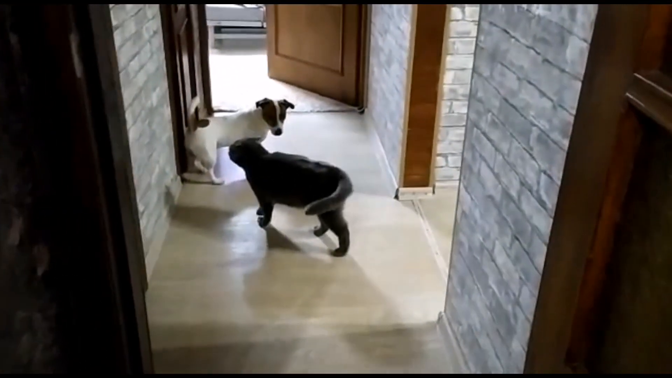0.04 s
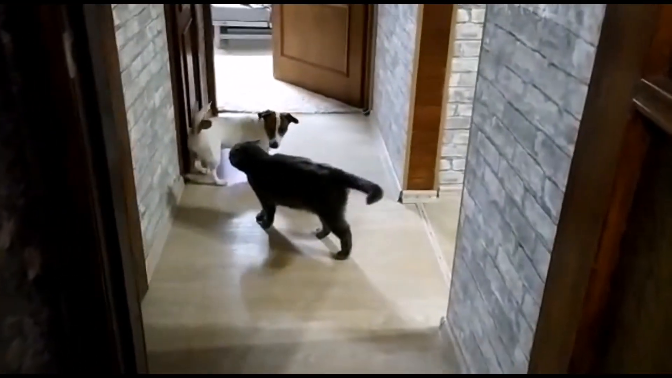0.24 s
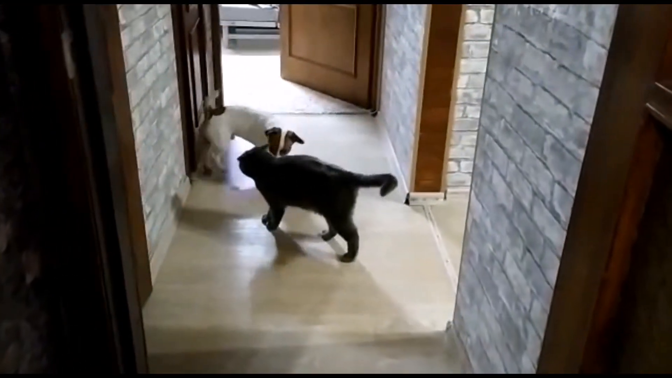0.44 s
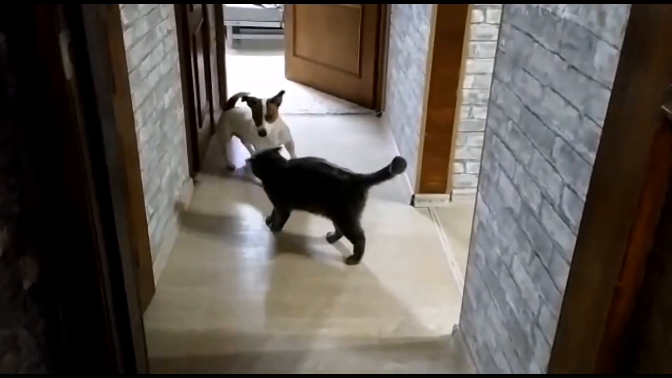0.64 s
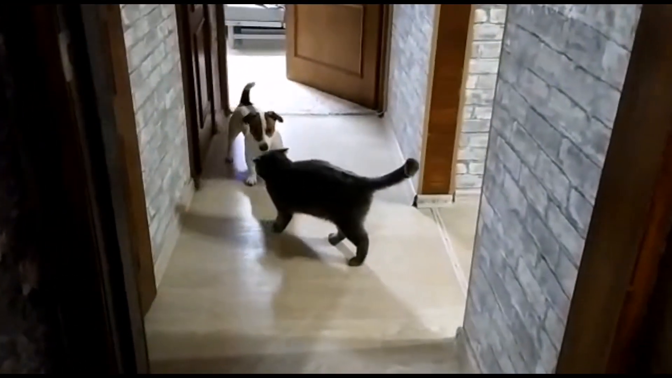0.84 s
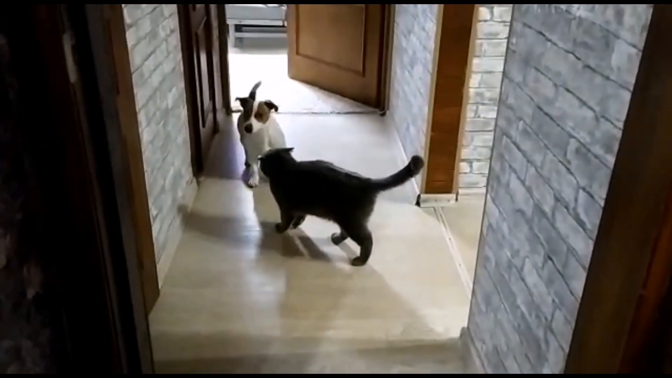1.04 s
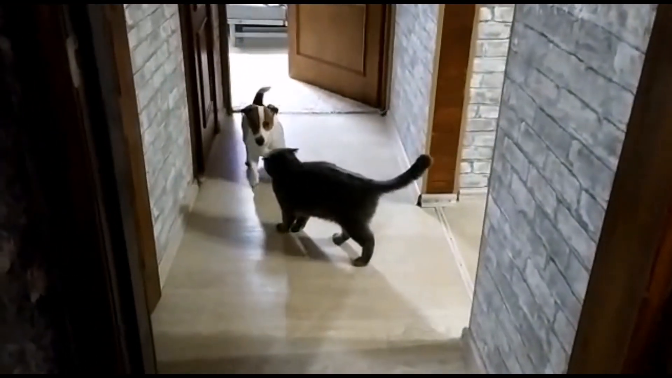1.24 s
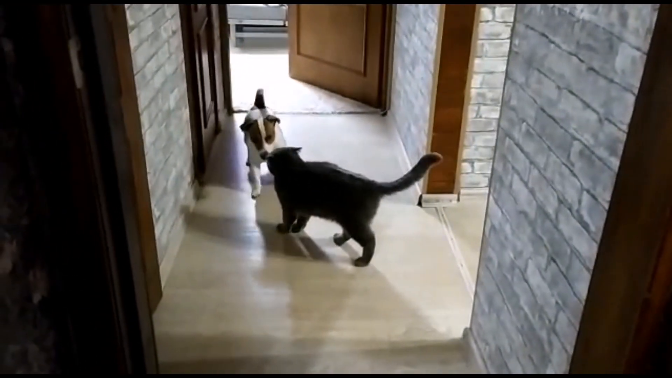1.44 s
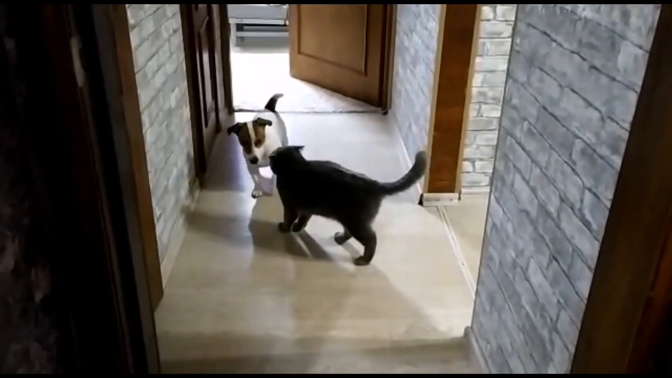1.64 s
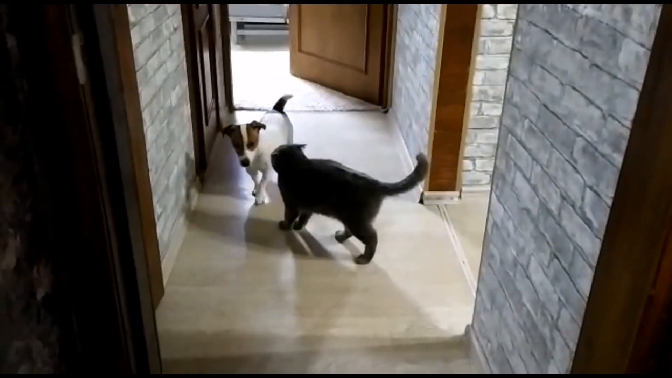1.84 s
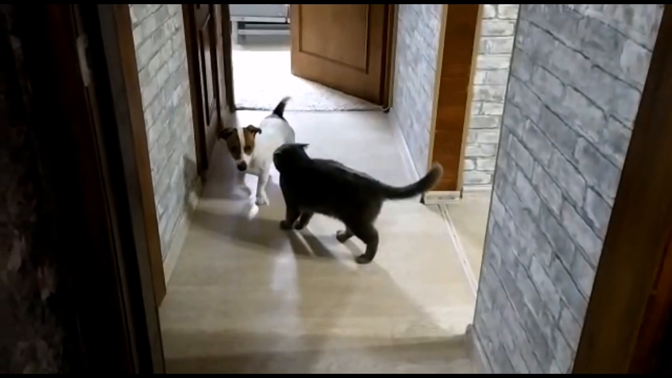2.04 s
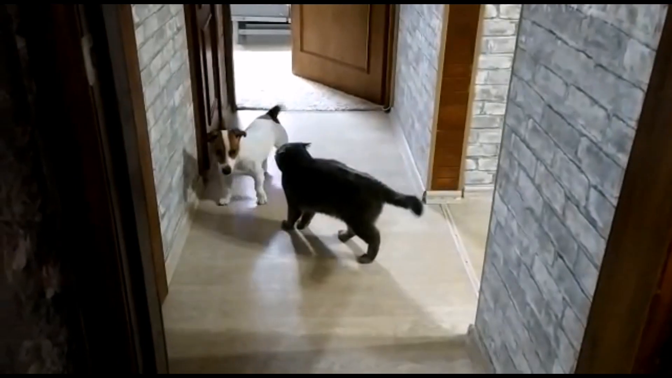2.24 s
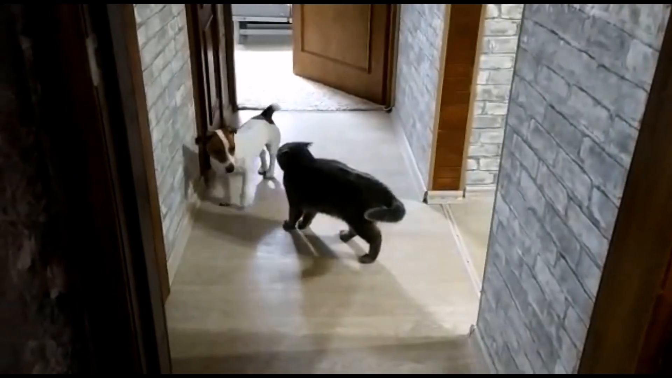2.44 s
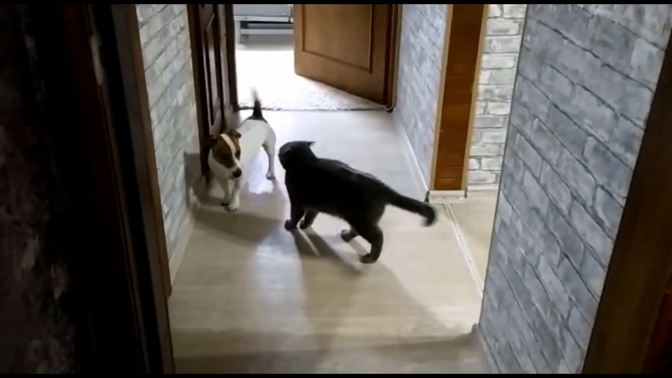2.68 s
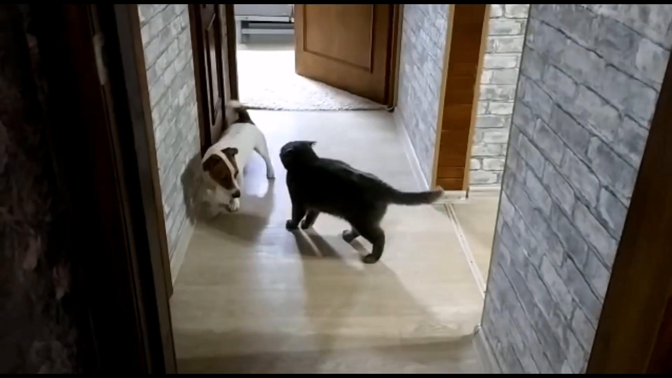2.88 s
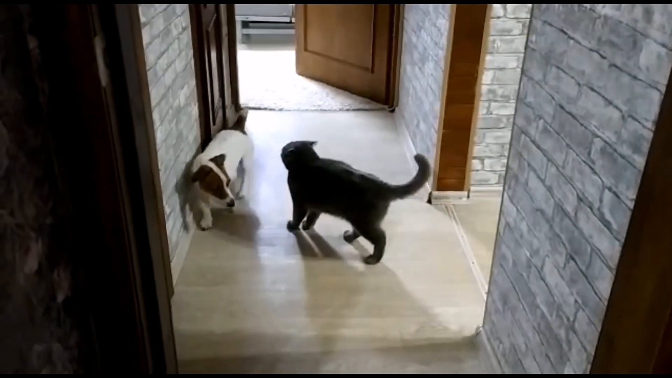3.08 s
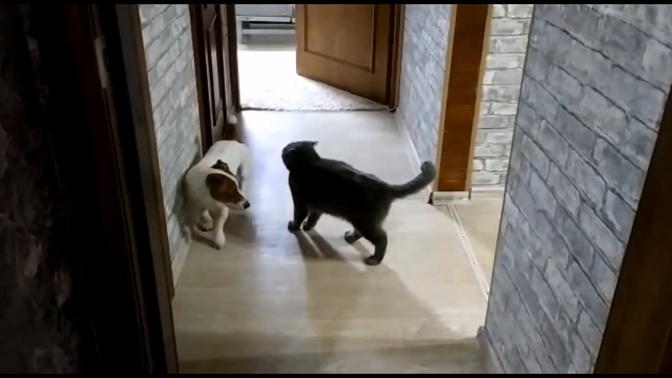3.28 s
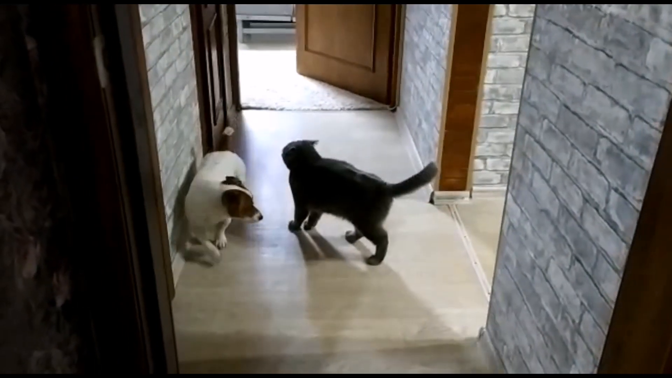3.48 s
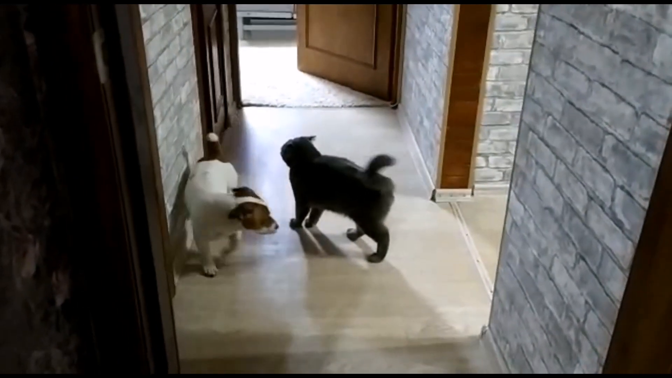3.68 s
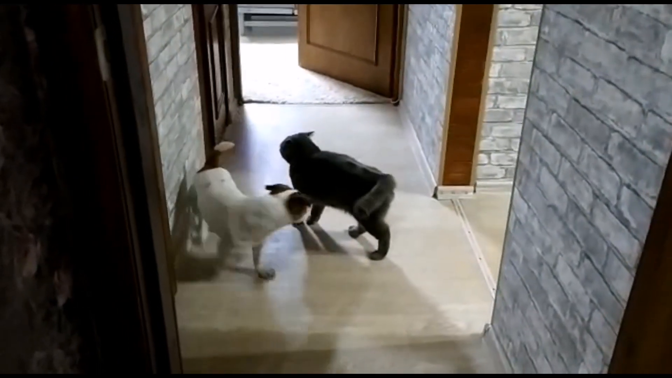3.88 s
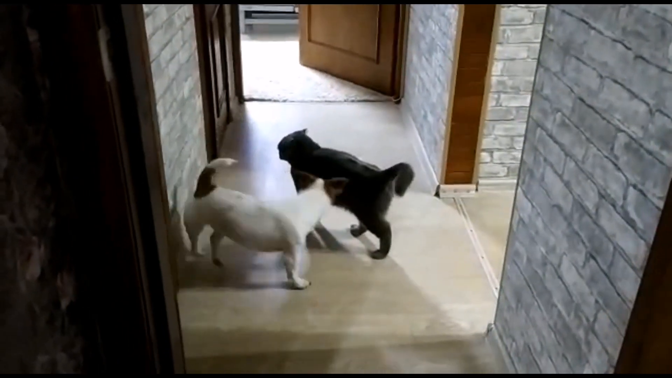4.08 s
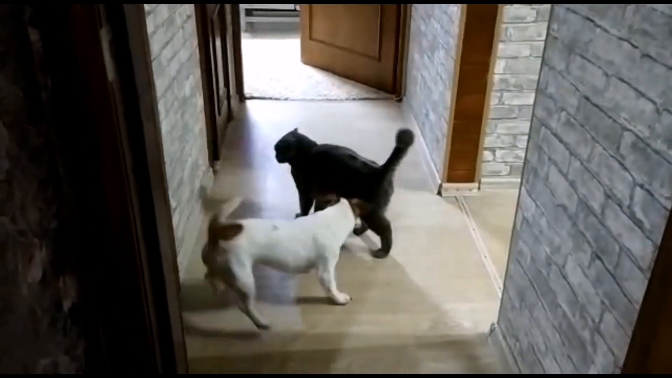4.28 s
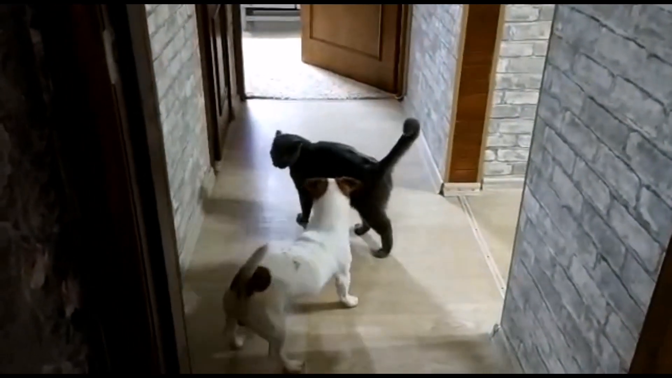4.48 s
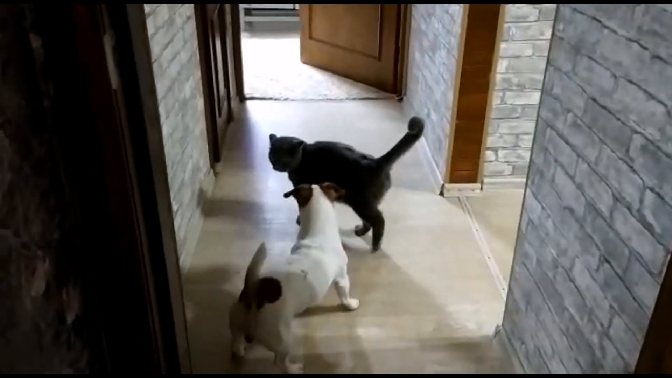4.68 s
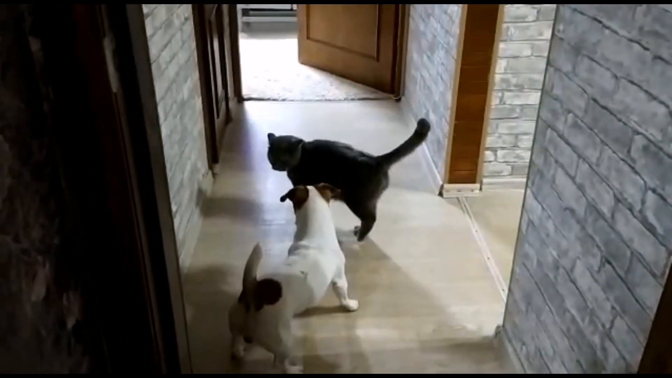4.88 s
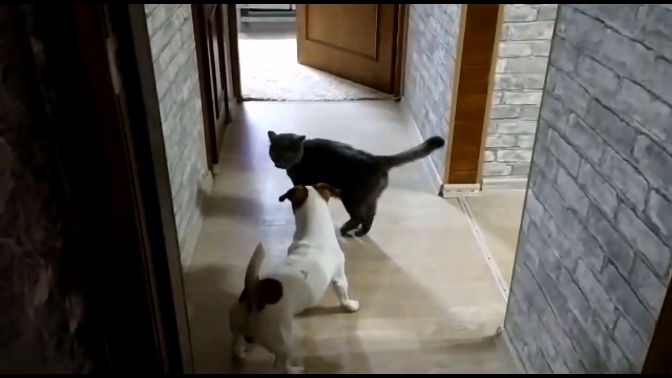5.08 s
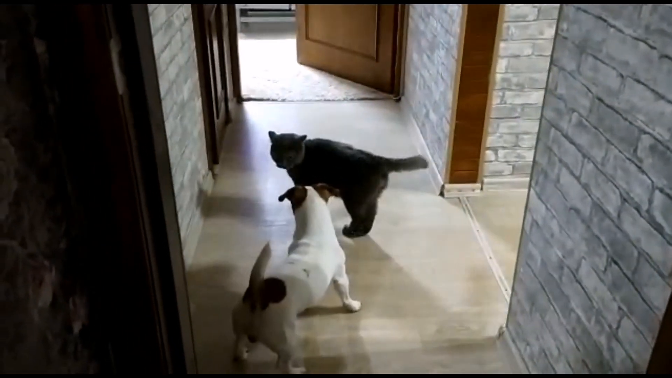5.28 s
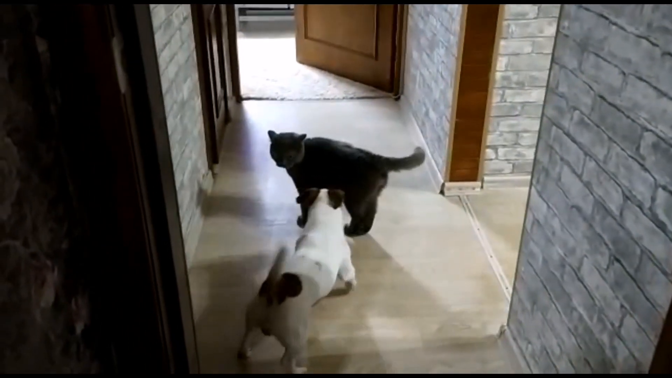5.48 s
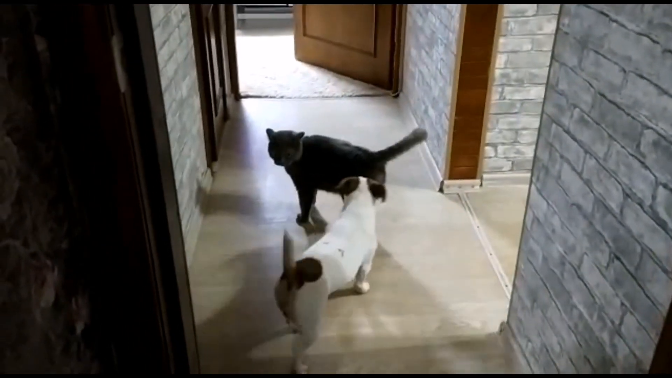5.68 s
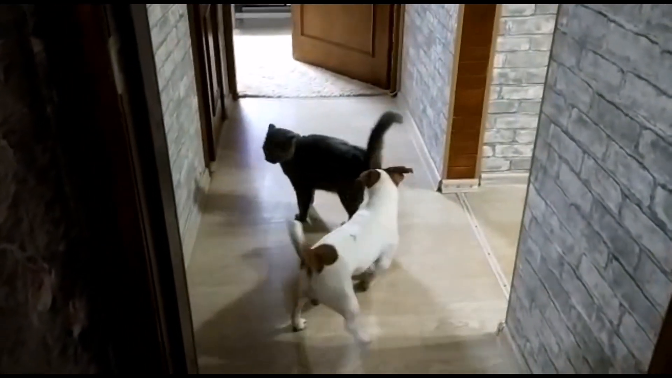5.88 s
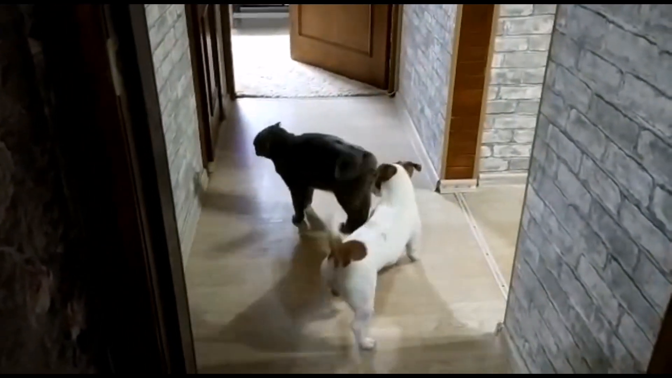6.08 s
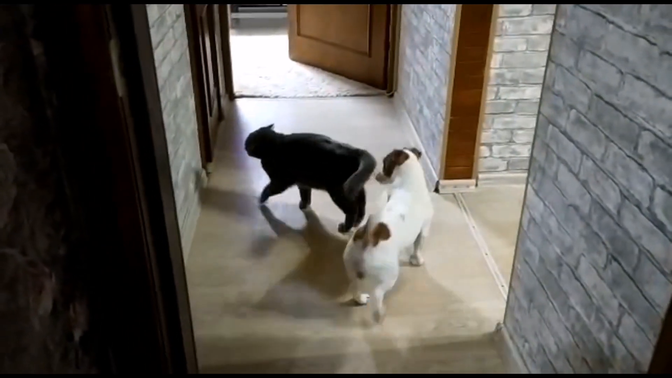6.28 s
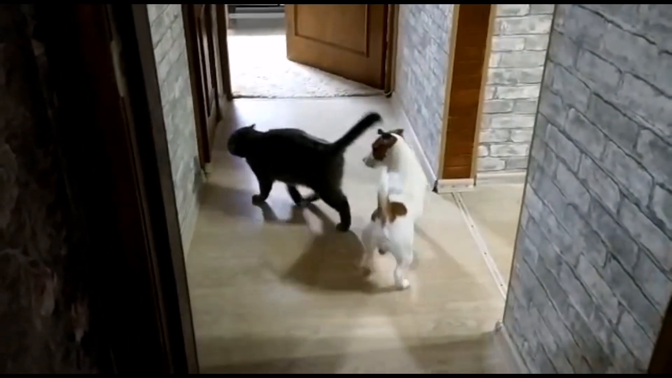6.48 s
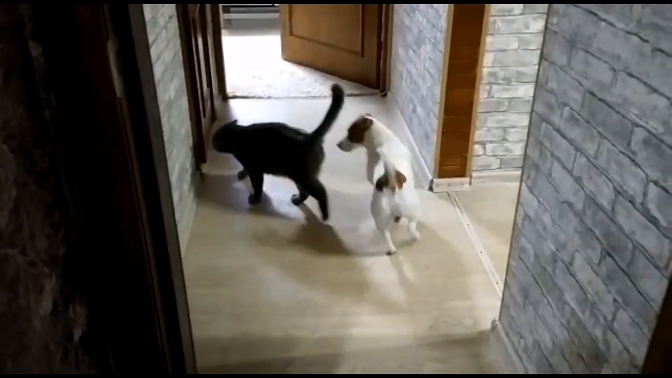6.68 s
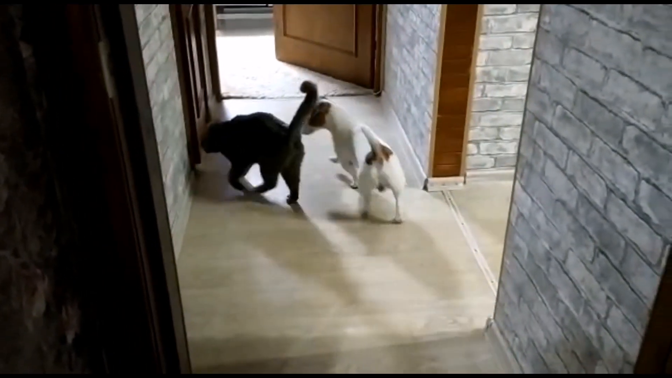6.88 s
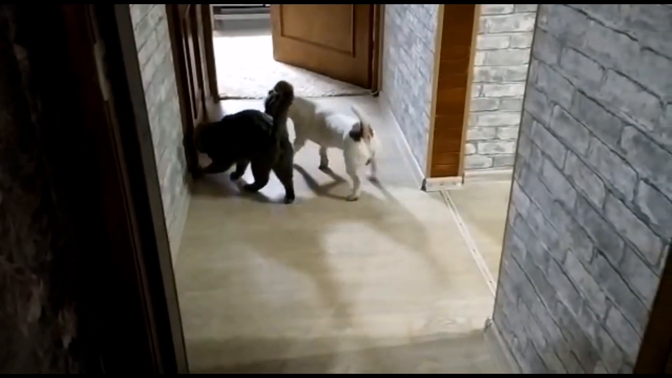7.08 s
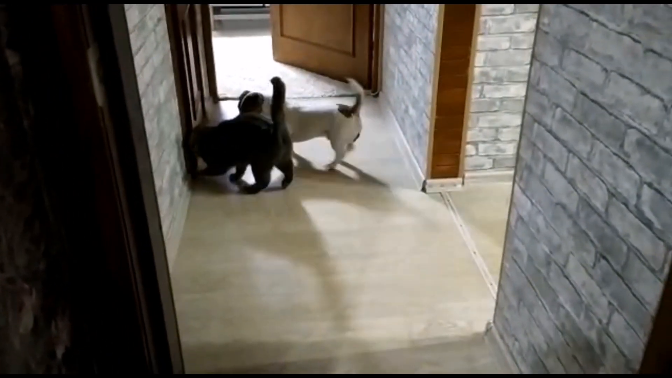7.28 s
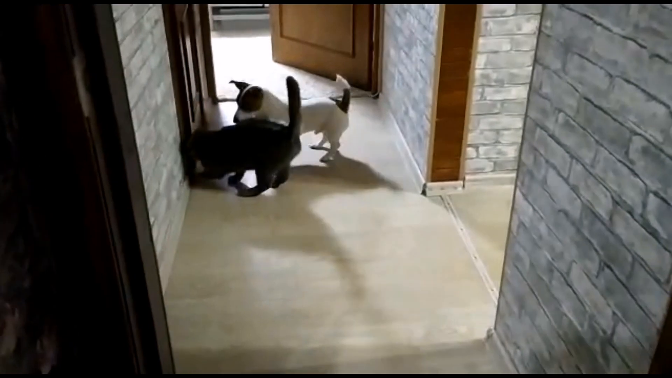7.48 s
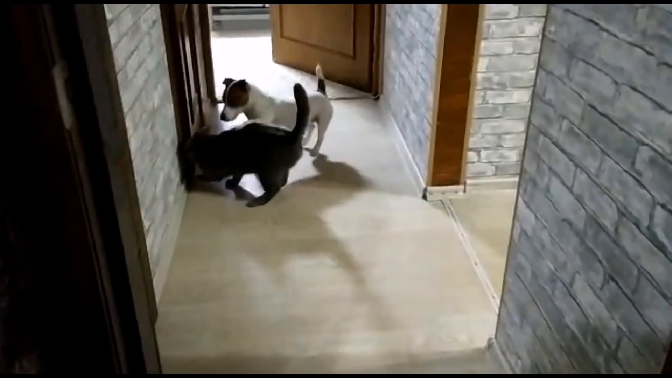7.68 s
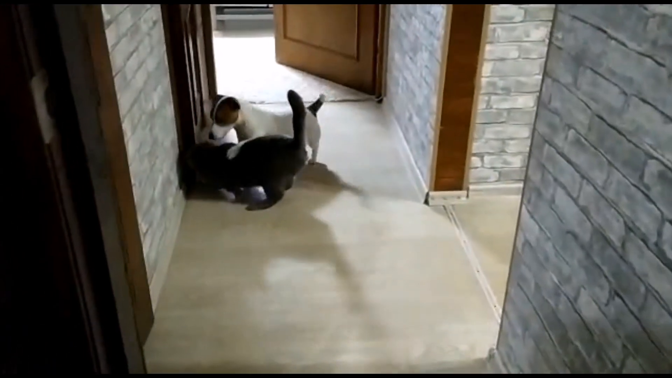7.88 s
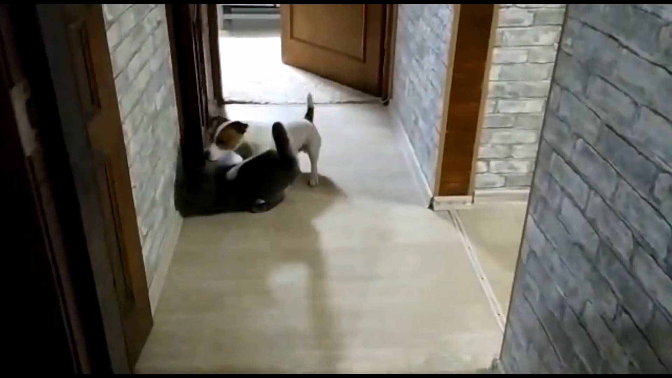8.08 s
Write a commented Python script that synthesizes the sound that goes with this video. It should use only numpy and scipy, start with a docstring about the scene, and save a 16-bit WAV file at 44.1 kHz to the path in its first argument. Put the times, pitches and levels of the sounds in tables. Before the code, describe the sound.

A quiet hallway with soft low house rumble, faint steady hum and hiss, heard by a phone a few metres from the animals. Thin low whining tones sound faintly at the start. From 0.4 to 0.9 s paws skid in a quick scratchy flurry, with another click near 1.1 s. A low, pulsing growl wavers from about 1 to 4.2 s under sparse, light claw ticks and soft pad steps. At 4.2-4.7 s the dog's claws clatter sharply, the loudest moment, with dull body thumps on the hollow floor and a rasping slide. It is nearly still until 5.5 s. Light steps return, growing busier around 6.4 s. From 7 s a stronger growl joins a faint gliding whine; from 7.4 s scrapes and scrabbling crowd together, with a heavier thump and a brief growl surge at 7.95 s. Short echoes follow every contact.

```python
"""A small dog trots round a cat in a hard-walled hallway, a few metres from a phone with two microphones.
Claws click and pads scuff on the laminate: bursts of noise that knock in the plank and echo in the hall.
Bodies thump as decaying floor modes; a low growl comes and goes as overtones of slow pulses, with thin
gliding tones, some of them single lines standing out of the growl. Underneath lie filtered-noise
house rumble, hiss and faint tones steady in pitch, wavering in level."""
import sys
import numpy as np
from scipy import signal
from scipy.fft import rfft, irfft
from scipy.io import wavfile
from scipy.ndimage import uniform_filter1d

SR = 44100
rng = np.random.default_rng(int(sys.argv[2]) if len(sys.argv) > 2 else 0)


def unload_audio(sound):
    """Save the sound as a 16-bit wav file, at the path given as the first command line argument."""
    columns = np.transpose(np.atleast_2d(sound))
    # keep every value between -1 and 1, then stretch to whole-number steps
    steps = np.round(np.clip(columns, -1, 1) * 32767)
    wavfile.write(sys.argv[1], SR, steps.astype(np.int16))


N = 358533


def undb(db):
    """Gain of a level in dB."""
    return 10 ** (np.asarray(db) / 20)


def unit(x):
    """Scaled to rms 1."""
    return x / np.sqrt(np.mean(x ** 2))


def curve(table):
    """Columns of a table at every sample, and a gate that is open while the table lasts."""
    start_s, *columns = np.transpose(table)
    t = np.arange(N) / SR
    inside = 1. * ((t >= start_s[0]) & (t <= start_s[-1]))
    gate = uniform_filter1d(inside, size=1500)
    return [np.interp(t, start_s, c) for c in columns] + [gate]


def colour(x, points):
    """Causal filter with the given (Hz, dB) spectrum, from the folded cepstrum."""
    hz, db = np.transpose(points)
    grid_hz = np.maximum(np.arange(4097) * SR / 8192, 1)
    log_gain = np.interp(np.log(grid_hz), np.log(hz), db) * np.log(10) / 20
    cepstrum = irfft(log_gain)
    cepstrum[1:4096] *= 2
    cepstrum[4097:] = 0
    impulse = irfft(np.exp(rfft(cepstrum)))[:4096]
    return signal.oaconvolve(x, impulse)[:len(x)]


def band(x, lo_hz, hi_hz):
    """Band-pass."""
    return signal.sosfilt(signal.butter(2, [lo_hz, hi_hz], "bandpass", fs=SR, output="sos"), x)


def walk(rate):
    """Random levels held 1 / rate s and slewed twice."""
    hold = int(SR / rate)
    steps = np.repeat(rng.standard_normal(N // hold + 1), hold)
    return uniform_filter1d(uniform_filter1d(steps, hold), hold)[:N]


def pan(x, db):
    """Two channels, db apart; positive leans left."""
    return x * undb(np.outer([.5, -.5], db))


# House rumble and microphone hiss as a spectrum.
# Each row: frequency in Hz, relative level in dB per Hz.
HOUSE_SPECTRUM = [(20, 2.5), (52, -2), (70, -9.5), (125, -11.5), (190, 0.5), (280, 1), (420, -8),
                  (600, -16), (1000, -23), (2500, -30.5), (4500, -36), (9500, -33.5), (12000, -42),
                  (15500, -64)]
# Faint tones steady in pitch. Each row: frequency in Hz, level in dB before its waver.
STEADY_TONES = [(100, -73), (147, -74), (295, -76.5)]
HOUSE_DB = -59.5  # rms of rumble and hiss


def house():
    """Rumble shared by both microphones, hiss of their own, and faint tones wavering in level."""
    shared, *own = (colour(rng.standard_normal(N), HOUSE_SPECTRUM) for _ in range(3))
    # the shared part keeps its lows, each microphone's own part gives up some of them
    lows = shared - signal.lfilter(*signal.butter(1, 900, "high", fs=SR), shared)
    apart = np.array([o - 0.66 * band(o, 70, 800) for o in own])
    rumble = unit(pan(lows, 7.7) * undb(1.4 * walk(5.35)) + apart)
    t = np.arange(N) / SR
    tones = sum(undb(db + 0.63 * walk(2.3)) * np.sin(2 * np.pi * hz * t) for hz, db in STEADY_TONES)
    return undb(HOUSE_DB) * rumble + pan(tones, 8.8)


HALL_T60_S, HALL_DB = 0.27, -2.5
TAIL_LOWPASS_HZ = 11060  # low-pass of the echo tail


def hall(x):
    """Dense echoes of a narrow hallway, different at each microphone; they set in within a millisecond."""
    t = np.arange(int(.5 * SR)) / SR
    envelope = 10 ** (-3 * t / HALL_T60_S) * (1 - np.exp(-t / 0.00018))
    tail = rng.standard_normal((2, len(t))) * envelope
    tail = signal.sosfilt(signal.butter(2, TAIL_LOWPASS_HZ, fs=SR, output="sos"), tail)
    tail /= np.sqrt(np.sum(tail ** 2, axis=1, keepdims=True))
    return undb(HALL_DB) * np.array([signal.oaconvolve(c, h)[:N] for c, h in zip(x, tail)])


# Thin gliding tones, some of them single lines standing out of the growl. Each row: start in seconds,
# length in seconds, first pitch in Hz, last pitch in Hz, level in dB before its waver.
TONE_GLIDES = [(0, 0.42, 385, 404, -57.5), (0, 0.35, 257.6, 249.7, -60), (0.97, 0.23, 212, 236.7, -55),
               (1.123, 0.15, 236, 231, -61.5), (3.2, 0.3, 238.3, 222.2, -61.5),
               (3.62, 0.22, 248, 268, -56.5), (5.825, 0.293, 347, 340, -65), (6.453, 0.22, 340, 340, -60.5),
               (7.052, 0.19, 345, 372, -55), (7.183, 0.3, 368, 349.8, -59)]
GLIDE_FADE_S, GLIDE_WAVER_DB = 0.031, 1.5
GLIDE_PITCH_WAVER = 0.0063  # share of the pitch


def gliding_tones():
    """Near-pure tones that glide a little, fading in and out."""
    out, t = 0, np.arange(N) / SR
    for start_s, length_s, first_hz, last_hz, db in TONE_GLIDES:
        end_s = start_s + length_s
        hz = np.interp(t, [start_s, end_s], [first_hz, last_hz]) * (1 + GLIDE_PITCH_WAVER * walk(11))
        fade = np.clip(np.minimum(t - start_s, end_s - t) / GLIDE_FADE_S, 0, 1)
        level = undb(db + GLIDE_WAVER_DB * walk(15))
        out = out + fade * level * np.sin(2 * np.pi * np.cumsum(hz) / SR)
    return out


# Low growls, one list for each. Each row: time in seconds, pulse rate in Hz,
# level in dB before the booms, centre of the throat's band in Hz.
GROWL_CURVES = [
    [(.93, 31.26, -77, 216), (1.06, 31.04, -59, 192), (1.11, 30.32, -59, 186), (1.21, 29.36, -59, 192),
     (1.34, 30.7, -60, 188), (1.46, 32.3, -59.5, 219), (1.56, 31.94, -56.5, 216), (1.75, 32.95, -58, 178),
     (1.88, 33.46, -59, 214), (2, 33.73, -57.5, 207.3), (2.12, 35.2, -59.5, 206)],
    [(2.22, 33.13, -64, 132), (2.46, 33.42, -66, 144), (2.57, 35.7, -57.5, 147), (2.68, 35.73, -57, 141),
     (2.8, 32.6, -62.5, 134), (2.95, 31.73, -58, 176), (3.12, 32.12, -62, 136), (3.25, 35.03, -60, 139),
     (3.34, 37.83, -55, 147), (3.48, 37.42, -56.5, 149), (3.6, 36.62, -62.5, 174),
     (3.88, 34.8, -61.5, 165.4), (4.26, 33.3, -62.5, 153)],
    [(7.06, 34.06, -59, 184), (7.17, 34.08, -51, 189), (7.3, 33.08, -55.5, 185), (7.4, 31.74, -54, 175),
     (7.5, 31.06, -55.5, 176), (7.57, 30.66, -52, 167), (7.65, 30.43, -57, 166), (7.72, 30.1, -58, 146),
     (7.83, 30.5, -53.5, 144), (7.88, 31, -64, 148)],
    [(7.952, 36.46, -42, 183), (7.99, 35.7, -49.5, 167), (8.03, 35.4, -54, 145), (8.06, 36.9, -51.5, 186),
     (8.13, 37.2, -49, 186)],
]
# Booms of the hallway, lifting any overtone that passes through them.
# Each row: frequency in Hz, half-width in Hz, strength of the added part in dB.
HALLWAY_BOOMS = [(98.6, 1.4, 8.5), (145, 3.8, 5.5), (181.8, 2.8, -7), (196, 1.3, -14), (230.3, 3.2, 2)]
THROAT_SHUT_HZ, THROAT_WIDENS = 112, 0.19  # the band widens as its centre rises above this, Hz per Hz
OVERTONE_WAVER_DB, OVERTONE_SLIP = 3, .5  # slip of phase in radians


def boom(hz):
    """Gain of the hallway's resonances at a frequency."""
    return 1 + sum(undb(lift_db) / (1 + ((hz - centre_hz) / width_hz) ** 2)
                   for centre_hz, width_hz, lift_db in HALLWAY_BOOMS)


def growls():
    """Slow pulses heard as overtones; a moving band stands out, each overtone wavers."""
    out = 0
    overtones = range(3, 13)
    for table in GROWL_CURVES:
        pulse_hz, db, throat_hz, gate = curve(table)
        width_hz = THROAT_WIDENS * np.maximum(throat_hz - THROAT_SHUT_HZ, 5)
        phase = 2 * np.pi * np.cumsum(pulse_hz) / SR
        gains = []
        for k in overtones:
            hz = k * pulse_hz
            # a broad floor from about 120 to 330 Hz, the throat's band above it
            broad = 0.34 / (1 + (hz / 330) ** 4) / (1 + (120 / hz) ** 6)
            throat = 1 / (1 + ((hz - throat_hz) / width_hz) ** 2)
            gains.append(undb(OVERTONE_WAVER_DB * walk(5.9)) * (broad + throat))
        stack = 0
        for k, gain in zip(overtones, gains):
            slip = OVERTONE_SLIP * walk(8) + rng.uniform(0, 2 * np.pi)
            stack = stack + gain * boom(k * pulse_hz) * np.sin(k * phase + slip)
        out = out + gate * undb(db) * stack * np.sqrt(2 / sum(g ** 2 for g in gains))
    return out


# Body thumps on the floor. Each row: start in seconds, level in dB, brightness in dB per octave.
BODY_THUMPS = [(4.321, -50.5, -1), (4.354, -44, -1.5), (4.376, -44, -1.5), (4.539, -53, 1.5),
               (7.498, -61, 7), (7.688, -57.5, 9), (7.948, -45.5, 3.5), (7.985, -57.5, 8)]
# Floor and door under a thump. Each row: frequency in Hz, relative level in dB, T60 in seconds.
HOLLOW_MODES = [(60.2, -9.5, 0.94), (135.4, -6.5, 0.41), (193.5, -3.5, 0.29), (330.4, 10.5, 0.063),
                (482.3, -4.5, 0.18), (773, -8.5, 0.057), (916, -16, 0.18)]
THUD_DB, THUD_T60_S = -9, 0.32  # dull noise of the blow against its ring


def thumps():
    """Soft bodies ring the hollow floor; duller thumps favour the deep modes, which build over a few cycles."""
    t = np.arange(SR // 2) / SR
    out = np.zeros(N + len(t))
    for start_s, db, tilt_db in BODY_THUMPS:
        ring = 0
        for hz, mode_db, t60_s in HOLLOW_MODES:
            octaves = np.log2(hz / 200)
            octaves = octaves + 1.1 * min(octaves, 0)  # steeper tilt below 200 Hz
            envelope = 10 ** (-3 * t / t60_s) * (1 - np.exp(-(t * hz / 2.0) ** 2))
            ring = ring + undb(mode_db + tilt_db * octaves) * np.sin(2 * np.pi * hz * t) * envelope
        thud = unit(band(rng.standard_normal(len(t)), 400, 960)) * undb(THUD_DB + tilt_db)
        thud = thud * 10 ** (-3 * t / THUD_T60_S) * (1 - np.exp(-t / 0.0031))
        out[int(start_s * SR):][:len(t)] += undb(db) * (ring + thud)
    return out[:N]


# Laminate as the phone hears it from a few metres. Each row: frequency in Hz, relative level in dB per Hz.
BOARD_SPECTRUM = [(350, -39), (600, -7.5), (716, -7.5), (915, -1), (1530, -6), (2190, -2), (2910, -6.5),
                  (5150, -15.5), (9120, -9), (10600, -14), (12300, -28.5), (13900, -30.5), (15500, -51)]
EARLY_SHARE = .3  # share of the rise by which the burst starts before its listed time
SECOND_TOE_MS, SECOND_TOE_DB = 9.2, -9.5  # mean delay and highest level of the next toe
GRIT_DB = 18  # fine grain of a scratch
TICKS_PER_S, TICK_SIZE = 260, .8  # tiny catches of claw tips within a contact
RING_DB, RING_WIDTH_HZ = 2.5, 70  # narrow rings of the plank, width to either side
RING_GLIDE = 0.142  # furthest slide of a ring as the paw moves, share of pitch
BODY_DB = -18  # dull weight of the paw under the knock
AIR_DB, AIR_DB_PER_DB = 13, 2.6  # harder contacts reach higher


def blows(table, sharpness, span):
    """Bursts of contact noise that swell and fade; each microphone hears its own path.

    Each row: time in seconds, strength in dB, knock against tick in dB, knock in Hz, pan in dB,
    time to the peak in ms. The span is in samples."""
    t = np.arange(span) / SR
    count = len(table)
    chance = rng.standard_normal((count, 5, span))
    catches = rng.exponential(size=(count, span)) * (rng.random((count, span)) < TICKS_PER_S / SR)
    spots = rng.random((count, 8))
    out, body = np.zeros((2, 2, N + span))
    air, bright = (signal.butter(n, hz, "high", fs=SR) for n, hz in ((2, 11000), (1, 3000)))
    narrow = signal.butter(1, RING_WIDTH_HZ, fs=SR)
    for row, noises, catch, spot in zip(table, chance, catches, spots):
        start_s, db, knock_db, knock_hz, pan_db, rise_ms = row
        mid, left, right, grip, load = noises
        start_s = start_s - EARLY_SHARE * rise_ms / 1000
        age = t / (rise_ms * (1 + EARLY_SHARE) / 1000)
        swell = (age * np.exp(1 - age)) ** sharpness
        late = int(SR * SECOND_TOE_MS / 1000 * 2 * spot[6])
        next_toe = np.roll(swell, late) * (t >= late / SR)
        swell = swell + undb(SECOND_TOE_DB - 10 * spot[7]) * next_toe
        # the left microphone hears the shared part three samples late
        shared = np.array([np.roll(mid, shift=3), mid])
        grain = (shared + 1.9 * np.array([left, right])) * swell

        def stutter(g, grit_db):
            coarse, fine = uniform_filter1d(g, size=100), uniform_filter1d(g[::-1], size=16)
            return grain * undb(23.6 * coarse + grit_db * fine)

        # tip and pad stutter apart
        tip, pad = stutter(grip, GRIT_DB), stutter(load, 4)
        tip = tip * (1 + TICK_SIZE * 12 * uniform_filter1d(catch, size=12))
        pad = pad * np.tanh(age)  # the pad takes weight after the tip has touched
        # the strength of the step sets the energy, however the grains fall
        tip, pad = (pan(b * np.linalg.norm(swell) / np.linalg.norm(b, axis=1, keepdims=True), pan_db)
                    for b in (tip, pad))
        # the plank knocks in a broad band of its own for each spot, the claw tip ticks above it
        knock = band(pad, 0.77 * knock_hz, 1.555 * knock_hz) * np.sqrt(2000 / knock_hz)
        knock = knock + 1.23 * band(band(pad, 804, 3240), 610, 3820)
        for place, slide in spot[:6].reshape(3, 2):
            ring_hz = 800 * 6.0 ** place * (1 + RING_GLIDE * (2 * slide - 1) * np.tanh(age / 3))
            carrier = np.cos(2 * np.pi * np.cumsum(ring_hz) / SR)
            knock = knock + undb(RING_DB) * signal.lfilter(*narrow, pad) * carrier
        tip = tip + undb(AIR_DB + AIR_DB_PER_DB * db) * signal.lfilter(*air, tip)
        contact = signal.lfilter(*bright, tip) + undb(knock_db) * knock
        at = int(start_s * SR)
        body[:, at:][:, :span] += undb(db + knock_db + BODY_DB) * pad.sum(axis=0)
        out[:, at:][:, :span] += undb(db) * contact
    on_board = np.array([colour(c, BOARD_SPECTRUM) for c in out])
    return (on_board + pan(band(body[0], 330, 760), 7.0))[:, :N]


# Faint scuffing between the steps. Each row: time in seconds, level in dB before its waver.
SHUFFLE_LEVELS = [(0, -81), (.25, -80), (.43, -70), (1.4, -83.5), (4.6, -76.5), (4.8, -97), (5.5, -93),
                  (5.65, -76), (8.13, -68.5)]


def shuffle():
    """Soft uneven rubbing of fur and pads: noise of the board with a fast random level."""
    db, gate = curve(SHUFFLE_LEVELS)
    rub = np.array([unit(colour(c, BOARD_SPECTRUM)) for c in rng.standard_normal((2, N))])
    return gate * undb(db + 5.2 * walk(40)) * rub


# A pad set down flat, claws barely touching. Each row: time in seconds, strength in dB, knock in Hz.
PAD_STEPS = [(2.969, -60, 1900), (3.131, -58, 1180), (3.411, -47, 970), (3.445, -75, 750),
             (3.592, -54.5, 810), (3.689, -57, 2095), (3.73, -51.5, 820), (3.9803, -52.5, 1079),
             (5.6072, -49.5, 1250), (5.972, -43.5, 1300), (6.196, -66, 1550), (6.598, -53.5, 1340),
             (7.4958, -42, 2170)]
PAD_KNOCK_DB, PAD_MS = 7, 8.55  # knock against tick; time to the peak
SKID_PAN_DB, SKID_SHARPNESS = -1, 1.8  # shared by pads and skids


def pads():
    """A flat pad gives mostly knock, little tick."""
    rows = [(s, db, PAD_KNOCK_DB, hz, SKID_PAN_DB, PAD_MS) for s, db, hz in PAD_STEPS]
    return blows(rows, SKID_SHARPNESS, span=5000)


# Skids of a paw on the laminate. Each row: time in seconds, strength in dB,
# knock of that spot of floor in Hz, time to the peak in ms.
PAW_SKIDS = [(0.428, -37.5, 810, 26), (0.536, -27.5, 2320, 18.3), (0.594, -27.5, 2160, 9.5),
             (0.656, -31.5, 2400, 9.9), (0.7202, -47.5, 1180, 17.4), (0.801, -44, 955, 27.5),
             (0.847, -29.5, 2190, 16), (0.8986, -31.5, 2030, 14), (1.069, -43.5, 1460, 15.8),
             (1.0916, -36.5, 1850, 13), (1.14, -40.5, 2400, 11.7), (1.278, -47.5, 1740, 18.4),
             (1.635, -43.5, 1120, 12.4), (1.6826, -45.5, 2180, 9), (1.77, -41.5, 2356, 8.5),
             (2.0249, -55, 864, 5.8), (2.162, -55, 1990, 11.7), (2.353, -39.5, 1130, 10),
             (2.4154, -43.5, 870, 14), (2.552, -47, 2320, 24), (2.5993, -43, 1290, 14.8),
             (2.7798, -47.5, 1340, 8.4), (2.912, -50, 2074, 3.2), (3.0974, -58.5, 850, 16),
             (3.3073, -51, 1580, 6.7), (3.5792, -53, 2000, 8.6), (3.723, -43, 970, 9.5),
             (3.7955, -46.5, 2315, 17.2), (4.046, -41.5, 2310, 17.5), (4.1571, -39.5, 1151, 17.4),
             (4.2406, -28, 2425, 6.8), (4.2549, -41, 1280, 23), (4.335, -38, 1450, 9.4),
             (4.356, -37, 1060, 8.8), (4.4591, -42, 1030, 5.6), (4.5368, -22.5, 2120, 9.4),
             (4.568, -24, 2300, 10.8), (4.624, -32, 2050, 22.5), (4.667, -27.5, 2130, 9.3),
             (5.543, -49, 1410, 21.5), (5.7236, -41, 1940, 9.5), (5.7948, -38.5, 2320, 10.6),
             (5.847, -35.5, 1270, 6.1), (5.9049, -49.5, 960, 48), (6.0845, -45, 2140, 14),
             (6.224, -41, 2250, 6.1), (6.279, -42, 2160, 24.5), (6.38, -30, 1630, 6.5),
             (6.4405, -29.5, 1890, 12), (6.554, -46, 980, 27), (6.7331, -48, 1080, 43),
             (6.7805, -36, 2080, 14.3), (6.9445, -44, 1070, 16), (7.001, -36, 1770, 7.4),
             (7.1218, -40.5, 1730, 10), (7.1725, -38, 2580, 7.4), (7.2818, -39.5, 2300, 18),
             (7.3416, -38, 2030, 8.6), (7.4082, -28, 1970, 16), (7.4545, -29, 2170, 26.7),
             (7.5535, -25.5, 930, 13), (7.611, -26.5, 2440, 15.3), (7.659, -36, 2250, 61),
             (7.7238, -27.5, 1040, 10), (7.789, -45.5, 1081, 38), (7.8558, -25.5, 2250, 11.8),
             (7.9187, -41, 1570, 29), (8.084, -37.5, 1990, 20)]
# knock against tick: harder skids and low spots knock more
SKID_KNOCK_DB, KNOCK_DB_PER_DB, KNOCK_DB_PER_OCT = -10.5, 0.05, -4.5


def skids():
    """A paw slips a little as it takes weight."""
    rows = []
    for s, db, hz, rise_ms in PAW_SKIDS:
        knock_db = SKID_KNOCK_DB + KNOCK_DB_PER_DB * db + KNOCK_DB_PER_OCT * np.log2(hz / 1500)
        rows.append((s, db, knock_db, hz, SKID_PAN_DB, rise_ms))
    return blows(rows, SKID_SHARPNESS, span=7000)


# Claw clicks a few metres off. Each row: time in seconds, strength in dB,
# knock of that spot of floor in Hz, knock against tick in dB.
CLAW_CLICKS = [(0.6566, -23.5, 2360, -10), (1.0916, -24, 2250, -3), (1.6337, -40, 1060, -2),
               (1.7665, -36, 1878, -5.5), (2.071, -31, 2940, -10), (2.3462, -42.5, 1050, 0.5),
               (2.4045, -30, 1160, -15), (2.4119, -34, 1570, -10.5), (2.574, -42.5, 1500, -7),
               (2.7742, -40, 1300, -8.5), (3.131, -45.5, 1199, -10), (3.237, -38, 1370, -8),
               (3.3015, -33, 1670, -15), (3.3603, -43.5, 1503, -12), (3.534, -34.5, 2180, -8.5),
               (3.57, -44.5, 2000, -14), (3.579, -31, 2097, -10.5), (3.797, -32, 2270, -8),
               (4.0448, -27, 2310, -14), (4.2546, -19, 1280, -12), (4.2578, -18, 2017, -14),
               (4.332, -20, 1540, -19), (4.338, -22.5, 1500, -17), (4.4585, -11.5, 1740, -20),
               (4.4651, -14, 1040, -17), (4.5357, -13.5, 1970, -34), (5.54, -46.5, 1390, -3.5),
               (5.7854, -24, 1300, -17), (5.9078, -32.5, 920, -1), (5.946, -40, 1600, -7),
               (6.0594, -29.5, 2170, -11), (6.0785, -35.5, 2000, -6.5), (6.2294, -33.5, 2340, -6.5),
               (6.3025, -41.5, 1700, -6), (6.361, -38.5, 1700, -8), (6.383, -27, 1390, -23),
               (6.5526, -36, 1000, -11), (6.998, -34, 980, -14), (7.147, -35, 1700, -13),
               (7.2793, -35, 2150, -22), (7.4074, -24.5, 1800, -27), (8.082, -32, 1670, -16)]
CLAW_PAN_DB, PAN_DB_PER_DB = -3, -0.0514  # the loudest claws fall furthest to the right
CLAW_MS, CLAW_SLOWS_PER_DB = 1.6, 0.03  # time to the peak at -21 dB; lighter claws land more slowly
CLAW_SHARPNESS = 1.9


def claws():
    """Each claw lands with a rattle that peaks within a few milliseconds."""
    rows = []
    for s, db, hz, knock_db in CLAW_CLICKS:
        rise_ms = CLAW_MS * np.exp(-CLAW_SLOWS_PER_DB * (db + 21))
        rows.append((s, db, knock_db, hz, CLAW_PAN_DB + PAN_DB_PER_DB * db, rise_ms))
    return blows(rows, CLAW_SHARPNESS, span=1500)


CLAW_ECHO_DB = -1.5  # claws send a little less into the hall
TOP_HZ = 15900


def scene():
    """Paws through the hallway's echo, low sounds mostly on the left, the house beneath."""
    clicks = claws()
    rubs = skids() + pads() + shuffle()
    echoes = hall(undb(CLAW_ECHO_DB) * clicks + rubs)
    lows = pan(growls() + gliding_tones() + thumps(), 5.7)
    return clicks + rubs + echoes + lows + house()


def record(dry):
    """The phone cuts the top."""
    return signal.sosfilt(signal.ellip(8, .2, 70, TOP_HZ, fs=SR, output="sos"), dry)


dry = scene()
out = record(dry)
unload_audio(out)
```